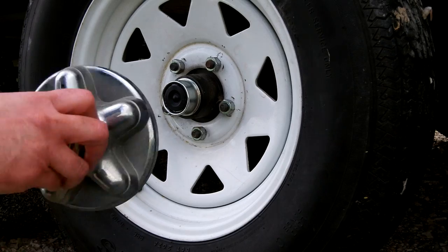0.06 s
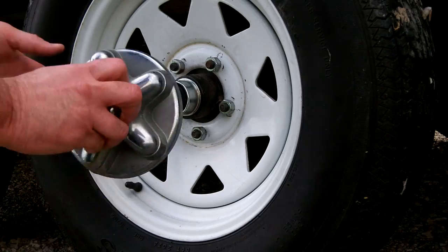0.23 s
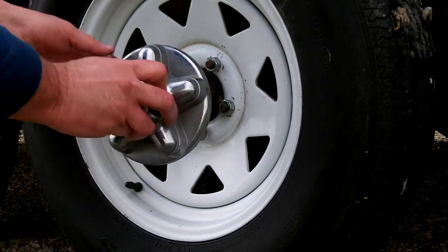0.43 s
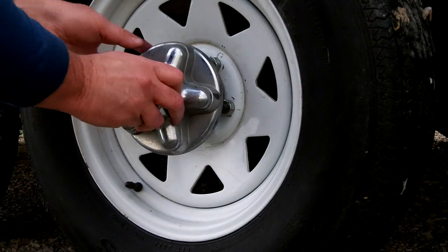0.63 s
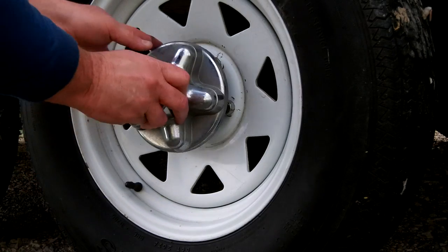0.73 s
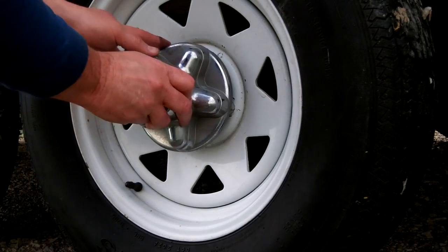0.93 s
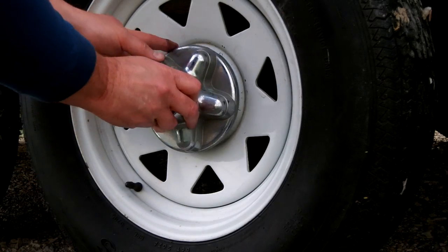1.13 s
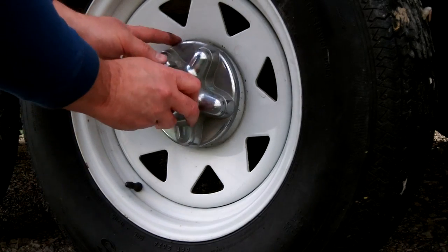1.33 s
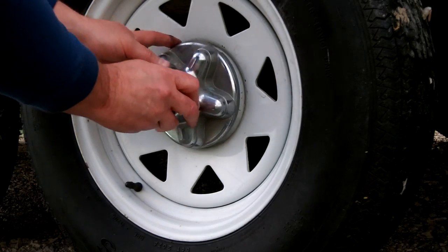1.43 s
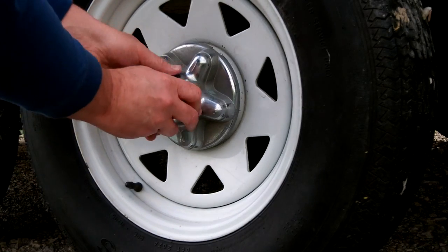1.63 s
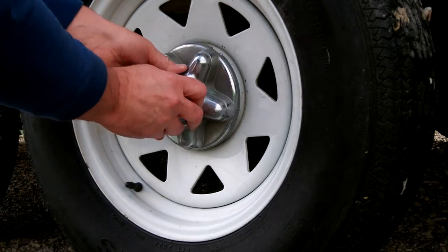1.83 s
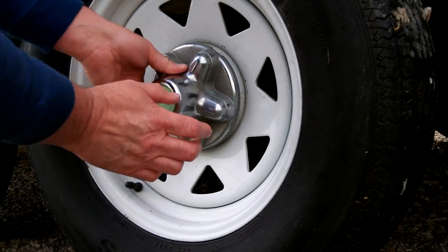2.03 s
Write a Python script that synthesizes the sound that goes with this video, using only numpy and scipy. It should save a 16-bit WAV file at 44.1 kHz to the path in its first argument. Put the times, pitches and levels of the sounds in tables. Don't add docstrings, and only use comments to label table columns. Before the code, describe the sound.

A thin metal hubcap is fitted onto a wheel, heard close outdoors. Until about 1.2 s there is only low wind buffeting and faint leafy hiss. Then small taps and light friction begin, with clearer clicks at 1.3 and 1.34, brief scrapes around 1.45, ticks at 1.6, and the loudest bright snap with a slight thud at 1.71. One last click at 1.78, then a soft finger slide fades.

```python
import sys
import numpy as np
from scipy import signal
from scipy.fft import rfft, irfft
from scipy.io import wavfile
from scipy.ndimage import uniform_filter1d

SR = 44100
rng = np.random.default_rng(int(sys.argv[2]) if len(sys.argv) > 2 else 0)


def convert_level_to_amplitude(level_db):
    exponent = np.asarray(level_db, float) / 20
    return 10 ** exponent


def unload_audio(sound):
    columns = np.transpose(np.atleast_2d(sound))
    steps = np.round(np.clip(columns, -1, 1) * 32767)
    wavfile.write(sys.argv[1], SR, steps.astype(np.int16))


N = 91728
T = np.arange(N) / SR

# f/Hz, level/dB per Hz
METAL = [(200, -20), (700, 1.5), (1500, -2), (2800, -5), (5000, -7), (16000, -8)]


def table(rows, x, log=False):
    a, b = np.array(rows).T[:2]
    if log:
        return np.interp(np.log(x + 1), np.log(a + 1), b)
    return np.interp(x, a, b)


def colour(x, rows):
    gain = convert_level_to_amplitude(table(rows, np.fft.rfftfreq(len(x), 1 / SR), True))
    y = irfft(rfft(x) * gain, len(x))
    return y / np.sqrt(np.mean(y ** 2))


def coloured_noise(rows, size=N):
    return colour(rng.standard_normal(size), rows)


def walk(rate):
    hold = int(SR / rate)
    steps = np.repeat(rng.standard_normal(N)[:N // hold + 1], hold)
    v = uniform_filter1d(uniform_filter1d(steps, hold), hold)[:N]
    return v / v.std()


def wind():
    # t/s, level/dB
    gusts = [(0.0, -54), (0.03, -40), (0.07, -51), (0.15, -43), (0.2, -46), (0.3, -45), (0.45, -47),
             (0.6, -50), (0.71, -44), (0.76, -50.5), (0.9, -54), (1.05, -52), (1.3, -56), (1.6, -59),
             (1.76, -53), (1.87, -47), (1.98, -53), (2.08, -49)]
    # f/Hz, level/dB per Hz
    wind_colour = [(5.9, -29), (10, 0), (22, 5.5), (42, -5.5), (118, -12), (291, -29.5), (500, -39.5),
                   (650, -65), (1100, -120)]
    buffet_db, buffet_per_s = 1.6, 30
    return convert_level_to_amplitude(table(gusts, T) + buffet_db * walk(buffet_per_s)) * coloured_noise(wind_colour)


def pops():
    # t/s, peak level/dB, f/Hz
    eddies = [(0.024, -42, 74), (0.11, -39, 35), (0.144, -35, 41.3), (2.02, -46, 40), (0.636, -45, 46),
              (0.805, -42, 65), (0.988, -46.5, 109), (0.934, -41, 14.6), (0.705, -41, 29), (1.07, -46, 29),
              (1.214, -45.5, 13), (1.7, -50, 37), (1.806, -49, 55)]
    pop_cycles, delay_s = 0.86, 0.008
    out = np.zeros(N)
    for s, db, hz in eddies:
        bump = np.exp(-2 * ((T - s - delay_s) * hz / pop_cycles) ** 2)
        out += convert_level_to_amplitude(db) * bump * np.sin(2 * np.pi * hz * (T - s))
    return out


def air():
    # f/Hz, level/dB per Hz
    leaf_colour = [(110, -17), (170, -9.5), (400, -13), (1500, -23.5), (2200, -26), (3200, -23),
                   (5500, -39), (7300, -58)]
    # t/s, level/dB, treble level/dB
    breeze = [(0, 1.5, 1), (.1, .5, 2.5), (.17, -1, -3.5), (.27, 0, 4), (.42, 0, 0), (.54, 1.5, 2),
              (.62, 1, -0.5), (.75, 0.46, -2), (.83, 1, -2), (.92, 0, -1.5), (1.0, 0.5, -1.5),
              (1.1, 1.5, -1), (1.8, 1.1, 0), (1.9, 0, -10), (1.97, -2, -9), (2.08, 0.5, -11.5)]
    air_db, swell_db, flicker_db, treble_flutter_db = -63, 0.5, 1.2, 2.0
    f = np.fft.rfftfreq(N, 1 / SR) + 1
    whole = rfft(coloured_noise(leaf_colour))
    swell = walk(23)
    treble = table([(s, db) for s, _, db in breeze], T) + treble_flutter_db * swell
    out = np.zeros(N)
    for hz in 140 * 2 ** (np.arange(15) / 2):
        band = irfft(whole * np.clip(1 - 2 * np.abs(np.log2(f / hz)), 0, 1), N)
        treble_share = min(hz / 6000, 1) ** 2
        out += band * convert_level_to_amplitude(swell_db * swell + treble_share * treble + flicker_db * walk(33))
    return convert_level_to_amplitude(air_db + table(breeze, T)) * out


def ring(t, hz, octaves, damp):
    # f/Hz, level/dB, t60/s
    cap_modes = [(550, -14, 0.07), (823, 2.5, 0.03), (923, 5, 0.023), (1451, -0.5, 0.092),
                 (1716, 0.5, 0.052), (2060, -1.5, 0.045), (2409, 2.5, .06), (2830, 7.5, 0.032),
                 (730, -3, 0.025), (4180, 3.5, 0.036), (4740, -0.5, .035), (4963, -0.5, 0.03),
                 (5300, -2.5, 0.035), (1250, -10, 0.03)]
    contact_s, scatter_db, detune = 0.0002, 1.0, 0.004
    crack_db, crack_t60_s, tail_db, tail_t60_s = -2.5, 0.024, -28.5, 0.13
    f, db, t60 = np.array(cap_modes).T[:, :, None]
    level_luck, pitch_luck = rng.standard_normal((2, len(f), 1))
    octaves = max(octaves, 0.2)

    def fade(t60_s):
        return convert_level_to_amplitude(-60 * np.maximum(t, 0) / t60_s) * np.clip(t / contact_s, 0, 1)

    gain = convert_level_to_amplitude(db - 8.0 * (np.log2(f / hz) / octaves) ** 2 + scatter_db * level_luck)
    tones = np.sin(2 * np.pi * f * (1 + detune * pitch_luck) * t)
    modes = (gain * fade(t60 * damp) * tones).sum(axis=0)

    bins = np.fft.rfftfreq(len(t), 1 / SR) + 1
    focus = convert_level_to_amplitude(np.maximum(-2.5 * (np.log2(bins / hz) / octaves) ** 2, -24))
    noise = irfft(rfft(coloured_noise(METAL, len(t))) * focus, len(t))
    noise_fade = convert_level_to_amplitude(crack_db) * fade(crack_t60_s) + convert_level_to_amplitude(tail_db) * fade(tail_t60_s)
    return modes / np.abs(modes).max() + noise / noise.std() * noise_fade / 2


def scrapes():
    # t/s, rise/s, fall/s, peak level/dB, f/Hz
    drags = [(.545, .01, .012, -59, 5900), (1.216, .006, .006, -49, 3000), (1.228, .008, .006, -49, 4180),
             (1.232, .004, .004, -51, 2500), (1.335, .008, .003, -48, 4950), (1.384, .005, .02, -46, 2830),
             (1.388, .004, .01, -48, 5200), (1.421, .001, .005, -39, 3000), (1.427, .002, .005, -38, 4300),
             (1.444, .008, .0012, -36, 2830), (1.442, .005, .002, -43, 4200),
             (1.464, .012, .004, -44, 2830), (1.474, .005, .004, -36, 2400), (1.44, .005, .006, -46, 750),
             (1.485, .006, .002, -38, 2100), (1.483, .003, .003, -44, 4900), (1.47, .006, .006, -46, 800),
             (1.572, .008, .006, -45, 1700), (1.556, .008, .012, -47, 4180), (1.581, .004, .003, -41, 2100),
             (1.566, .004, .005, -48, 800), (1.589, .004, .002, -31, 2100), (1.601, .002, .003, -31, 4200),
             (1.5995, .003, .002, -30, 2830), (1.612, .006, .01, -45, 1700), (1.699, .004, .004, -29, 1500),
             (1.7, .005, .005, -30, 880), (1.695, .004, .008, -36, 5300), (1.712, .0025, .0012, -11, 5050),
             (1.7125, .002, .002, -16, 2250), (1.761, .002, .01, -43, 2800), (1.78, .0015, .002, -30, 2300),
             (1.698, .004, .006, -33, 2060), (1.7, .005, .005, -36, 3000), (1.605, .003, .004, -36, 4960)]
    octaves, grit_db, damp = 0.33, 3.5, 0.55
    out, size = np.zeros(N + SR), SR // 5
    t = np.arange(size) / SR
    u = t - t[size // 2]
    for s, rise, fall, db, hz in drags:
        i = int(s * SR) - size // 2
        grit = rng.standard_normal(size) * convert_level_to_amplitude(grit_db * rng.exponential(size=size))
        pressure = np.exp(np.minimum(u / rise, -u / fall))
        y = signal.fftconvolve(grit * pressure, ring(t, hz, octaves, damp))
        out[i:i + len(y)] += convert_level_to_amplitude(db) * y / np.abs(y).max()
    return out[:N]


def rub():
    # t/s, level/dB
    rub_pressure = [(1.18, -75), (1.2, -70), (1.225, -65), (1.242, -69), (1.262, -62), (1.285, -62.5),
                    (1.32, -65), (1.36, -60.5), (1.4, -54.5), (1.46, -57), (1.49, -58), (1.515, -61),
                    (1.555, -58), (1.624, -59), (1.65, -57), (1.675, -70), (1.74, -58), (1.82, -61)]
    flutter_db = 2.2
    seated = np.clip((T - 1.177) / 0.004, 0, 1) * np.clip((1.84 - T) / 0.03, 0, 1)
    return seated * convert_level_to_amplitude(table(rub_pressure, T) + flutter_db * walk(90)) * coloured_noise(METAL)


def taps():
    # t/s, peak level/dB, f/Hz, spread/octaves
    knocks = [(1.187, -39, 2700, 0.66), (1.1873, -42, 840, .5), (1.195, -44, 2650, 1),
              (1.2503, -43, 4180, 0.11), (1.25, -46.5, 2280, .6), (1.2945, -41, 550, .2),
              (1.2958, -32, 1150, .4), (1.294, -27, 980, 0.75), (1.2955, -30, 2240, 0.57),
              (1.295, -35.5, 4600, 0.7), (1.3417, -25, 4900, 0.2), (1.342, -35, 2520, 0.88),
              (1.4344, -33, 1850, 1.1), (1.4258, -38, 4180, .5), (1.4712, -41, 800, .4),
              (1.4345, -42, 780, .4), (1.587, -36, 2060, .4), (1.588, -40.5, 887, 0.65),
              (1.599, -33.5, 800, 0.33), (1.6025, -34, 740, 0.3), (1.7047, -22, 963, 0.35),
              (1.7065, -21, 930, .35), (1.7095, -21, 2060, 0.25), (1.7105, -26, 860, 0.3),
              (1.7135, -16, 5000, 0.34), (1.715, -19.5, 2409, .25), (1.7206, -27.5, 2409, 0.23),
              (1.7782, -25, 3820, 0.64), (1.778, -37, 780, 0.5), (1.6009, -21, 2830, 0.16),
              (1.6036, -36, 2830, 0.36), (1.7085, -18, 2930, .6), (1.705, -29, 5180, 0.26),
              (1.5915, -35.5, 2060, 0.34)]
    out, size = np.zeros(N + SR), SR // 5
    t = np.arange(size) / SR
    for s, db, hz, octaves in knocks:
        i = int(s * SR)
        y = ring(t - (s - i / SR), hz, octaves, 0.89)
        out[i:i + size] += convert_level_to_amplitude(db) * y / np.abs(y).max()
    return out[:N]


def muffle(x):
    # f/Hz, level/dB
    path = [(120, -12), (500, 0), (5400, -0.5), (6000, -12), (7000, -9), (7700, -21), (9300, -43.5),
            (13000, -58.5)]
    gain = convert_level_to_amplitude(table(path, np.fft.rfftfreq(2048, 1 / SR), True))
    cepstrum = irfft(np.log(gain))
    cepstrum[1:1024] *= 2
    cepstrum[1025:] = 0
    response = irfft(np.exp(rfft(cepstrum)))[:1024]
    return signal.fftconvolve(x, response)[:N]


def bursts(rows, t60, rise_s=0.00076):
    out = np.zeros(N)
    for s, db in rows:
        u = T - s
        out += convert_level_to_amplitude(db - 60 * np.maximum(u, 0) / t60) * np.exp(np.minimum(u, 0) / rise_s)
    return out


def sizzle():
    # t/s, level/dB
    sprays = [
        (1.294, -83),
        (1.342, -73),
        (1.601, -86),
        (1.701, -66),
        (1.7065, -58),
        (1.7105, -47.5),
        (1.713, -39),
        (1.7205, -60.5),
        (1.778, -66),
    ]
    # f/Hz, level/dB per Hz
    rim_colour = [(7600, -29), (8500, -0.5), (9250, 8.5), (10400, -5.5), (11500, -16), (13500, -23),
                  (14800, -30.5), (15500, -48)]
    # t/s, level/dB
    shimmer_starts = [
        (1.343, -94),
        (1.7, -76.5),
        (1.778, -102),
    ]
    # f/Hz, level/dB per Hz
    shimmer_colour = [(7800, -26.5), (8800, -3), (13800, -3), (14600, -34.5)]
    spray = bursts(sprays, 0.015) * coloured_noise(rim_colour)
    return spray + bursts(shimmer_starts, 0.3) * coloured_noise(shimmer_colour)


def thud():
    # f/Hz, level/dB, t60/s
    wheel_modes = [(234, -46, 0.078), (382, -40.5, 0.047)]
    u = np.maximum(T - 1.709, 0)
    return sum(convert_level_to_amplitude(db - 60 * u / t60) * np.sin(2 * np.pi * hz * u) for hz, db, t60 in wheel_modes)


def finger():
    # f/Hz, level/dB per Hz
    finger_colour = [(1000, 1.5), (3000, -1.5), (7000, -7.5), (12000, -15.5), (16000, -15.5)]
    start_s, slide_db, hold_s, t60_s = 1.812, -58.5, 0.019, 0.16
    u = T - start_s
    fade = convert_level_to_amplitude(slide_db - 60 * np.maximum(u - hold_s, 0) / t60_s)
    return (u > 0) * fade * coloured_noise(finger_colour)


def scene():
    outdoors = wind() + pops() + air()
    slide = finger()
    contacts = muffle(rub() + taps() + scrapes())
    return (outdoors + slide + contacts + sizzle() + thud())[None]


def low_pass(x):
    return signal.sosfilt(signal.butter(12, 15750, fs=SR, output="sos"), x)


def record(dry):
    hiss_db = -96.5
    mix = dry + convert_level_to_amplitude(hiss_db) * rng.standard_normal(dry.shape)
    return low_pass(mix)


dry = scene()
out = record(dry)
unload_audio(out)
```